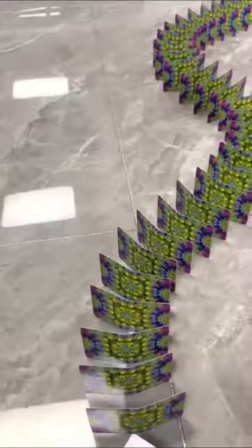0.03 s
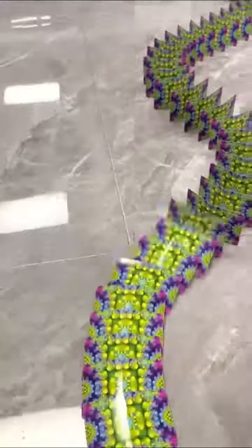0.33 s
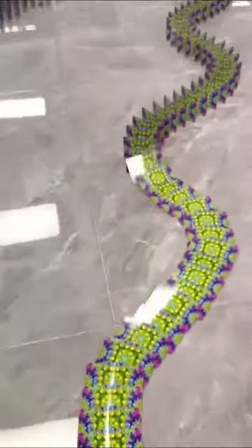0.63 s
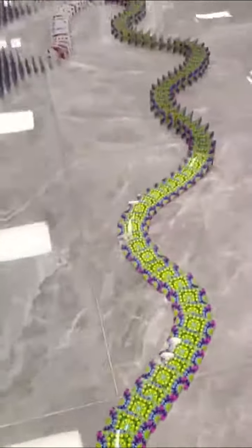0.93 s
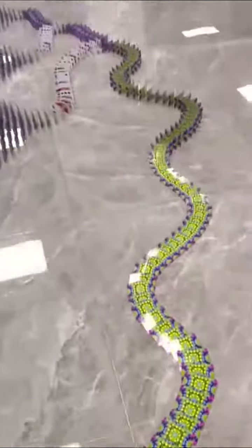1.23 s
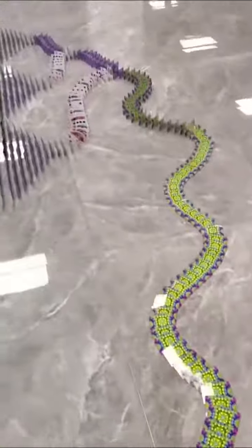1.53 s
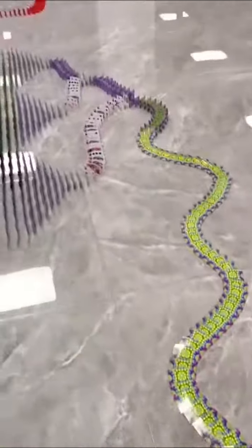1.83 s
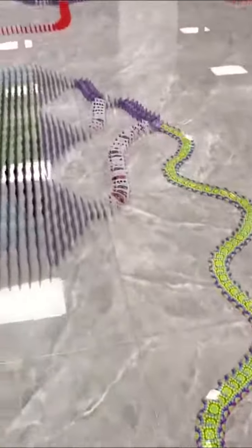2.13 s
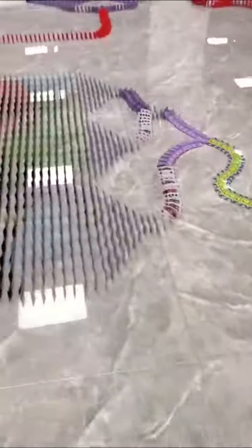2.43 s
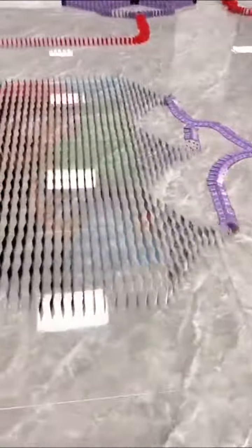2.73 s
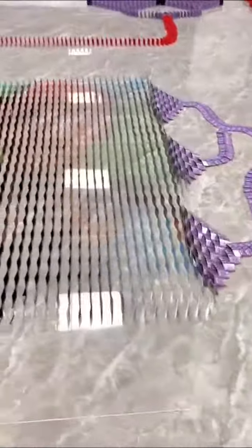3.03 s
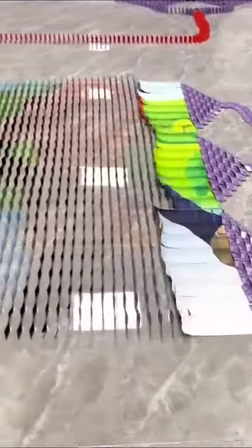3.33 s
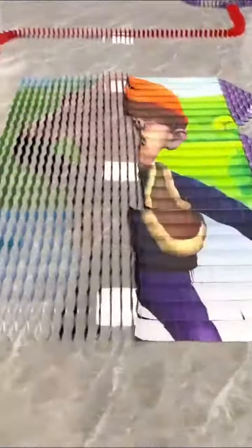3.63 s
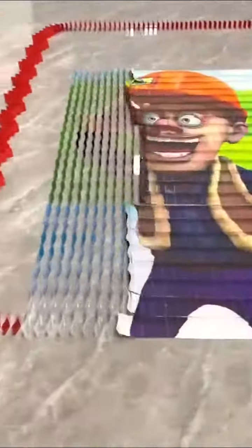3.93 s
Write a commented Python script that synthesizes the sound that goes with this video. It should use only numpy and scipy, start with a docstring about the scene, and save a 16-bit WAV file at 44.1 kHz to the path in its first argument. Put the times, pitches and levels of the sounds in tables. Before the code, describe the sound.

Playing cards topple one after another across a stone floor with a light patter, sliding hiss and scattered snaps. Then a whole field of cards falls in a louder, dense clatter, echoing slightly in a large room.

```python
"""A line of folded playing cards topples away across a stone floor in a large room.
Each card strikes the next and slides down its back: impacts make a patter, friction a hiss.
Single cards snap on the floor; then a whole field goes down, its impacts merging into a dense clatter.
Soft low thumps and a ventilation drone lie underneath, and hard walls add reverberation."""
import sys
import numpy as np
from scipy import signal
from scipy.fft import rfft, irfft
from scipy.io import wavfile

SR = 44100
rng = np.random.default_rng(int(sys.argv[2]) if len(sys.argv) > 2 else 0)


def materialize(psi):
    """Save the field psi as 16-bit PCM at rate SR to the path in sys.argv[1].

    A 1-D psi becomes a single channel; in a 2-D psi each row is a channel.
    """
    bounded = np.clip(np.atleast_2d(psi).T, -1, 1)
    quanta = np.round(bounded * 32767).astype(np.int16)
    wavfile.write(sys.argv[1], SR, quanta)


N = 176400
T = np.arange(N) / SR


def toppling_line():
    """Impact and sliding friction: each card taps the next and slides; the hiss dulls as it recedes."""
    # envelopes of the line (time [s], tap level [dB], slide level [dB])
    envelopes = [(.24, -72, -90), (.262, -38, -61), (.29, -55, -75), (.31, -39, -56), (.338, -56, -77),
                 (.36, -39, -45), (.41, -37, -49.5), (.51, -34, -38), (.62, -60, -46), (.685, -45, -46),
                 (.75, -31, -43), (.83, -60, -54), (.87, -36.5, -48), (.93, -49.5, -51.5),
                 (.97, -42.5, -47), (1.03, -36.5, -40.5), (1.09, -39, -40.5), (1.19, -42, -52),
                 (1.29, -47, -53), (1.36, -37, -47), (1.44, -41.5, -48.5), (1.50, -40.5, -40),
                 (1.62, -38, -49), (1.72, -44, -47.5), (1.81, -45.5, -52.5), (1.87, -37, -43.5),
                 (1.99, -41.5, -48.5), (2.12, -39, -48.5), (2.19, -42.5, -48.5), (2.31, -44.5, -47),
                 (2.35, -40, -40), (2.42, -41, -46), (2.52, -34, -41), (2.66, -40, -44),
                 (2.79, -37.5, -38.5), (2.84, -31.5, -38.5), (2.93, -36.5, -42), (3.1, -41, -41.5),
                 (3.25, -35.5, -38.5), (4, -45, -39.5)]
    # spectra of the taps and of the sliding (frequency [Hz], level [dB])
    tap_spectrum = [(60, -28), (200, 0), (460, -6.5), (680, -0.5), (860, -4), (1100, -1.5), (1350, -3),
                    (2050, 3), (2700, 0.5), (3400, -1.5), (4500, -34.5), (9000, -49), (15000, -80)]
    slide_spectrum = [(1500, -4), (3500, -0.5), (5200, 2.5), (6700, -2.5), (8300, -2), (9600, -10),
                      (12000, -12.5), (15000, -17)]
    sizzle_hz, sizzle_db, recede_db_per_s = 9500, 12.5, 21
    rings = amp(-5) * flexing(decay_s=0.0096, count=3600)
    impacts = unit(contacts(per_s=2000, spread_db=1.5))
    taps = unit(colour(stereo(impacts + rings), tap_spectrum))
    friction = unit(contacts(per_s=4000, spread_db=2))
    slide = unit(colour(stereo(friction + rings), slide_spectrum))
    sizzle = (slide - below(slide, sizzle_hz)) * amp(sizzle_db - recede_db_per_s * T)
    return taps * amp(curve(envelopes, column=1)) + (slide + sizzle) * amp(curve(envelopes, column=2))


def contacts(per_s, spread_db):
    """Shot noise: two independent streams of tiny impacts, random in time, strength and sign."""
    hit = rng.random((2, N)) < per_s / SR
    spread = np.minimum(rng.exponential(size=(2, N)), 4)
    return hit * amp(spread_db * spread) * np.sign(rng.standard_normal((2, N)))


def flexing(decay_s, count, size=900):
    """Damped bending vibration: struck cards ring briefly, each at its own pitch and place."""
    low_hz, high_hz, spread_db = 511.5, 8746, 9
    out, t = np.zeros((2, N)), np.arange(size) / SR
    for when, pitch, strength, place in rng.random((count, 4)):
        hz = low_hz + pitch * (high_hz - low_hz)
        ring = amp(spread_db * strength) * np.sin(2 * np.pi * hz * t) * np.exp(-t / decay_s)
        direction = [np.cos(2 * np.pi * place), np.sin(2 * np.pi * place)]
        add(out, when * N / SR, np.outer(direction, ring))
    return unit(out)


def floor_snaps(size=2600):
    """Impact excitation: a landing card rings, chatters, ticks at its edge and expels trapped air."""
    # landings (time [s], relative level [dB], ring frequency [Hz], tick level [dB], puff level [dB],
    # settling time [s]); tick and puff are relative to ring and chatter together
    landings = [(0.2645, -38.5, 2460, 0, -3, 0.0035), (0.315, -28.5, 1710, -16.5, -7.5, 0.00066),
                (0.3531, -26.5, 1800, -14, -23, 0.0014), (0.3587, -29, 2040, -21, -20, 0.005),
                (0.378, -28, 2240, -0.5, -14, 0.0038), (0.4228, -34, 2480, 0.5, -5, 0.0017),
                (0.4289, -33, 1990, -8, -27, 0.0025), (0.4695, -31.5, 2000, -2.5, -13, 0.0011),
                (0.5512, -25.5, 1900, -3.5, -5.5, 0.0026), (0.5823, -20.5, 2010, -11, -11.5, 0.0029),
                (0.6108, -34.5, 1900, 1, -2.5, 0.0075), (0.6299, -35.5, 2360, 0.5, -25, 0.0032),
                (0.6478, -34.5, 1920, 0, -5, 0.0041), (0.691, -38.5, 2580, 1, -8, 0.0019),
                (0.7752, -27.5, 2210, -2.5, -3, 0.0026), (0.8205, -30, 2400, -3.5, -17, 0.0026),
                (0.8437, -39, 2010, -1, -1, 0.0041), (0.8905, -44, 2380, 0, -19, 0.0031),
                (0.9415, -37, 2720, -1.5, -7, 0.0018), (0.9935, -33, 2420, -4, -8.5, 0.015),
                (1.0226, -35, 2030, -15, -9, 0.0057), (1.0569, -26, 1950, -8, -7.5, 0.00091),
                (1.1222, -34, 2100, -1, -7.5, 0.005), (1.2212, -43, 2430, 1, -2, 0.01),
                (1.2767, -36, 2330, -7, -24, 0.0034), (1.308, -20.5, 2280, -20, -16, 0.00044),
                (1.402, -38.5, 2020, -6, -13, 0.0021), (1.5125, -33.5, 2360, -0.5, -32, 0.0027),
                (1.585, -39.5, 2350, 2, -24, 0.006), (1.8328, -26.5, 1920, -11.5, -20, 0.002),
                (1.8595, -35, 1920, -1.5, -18, 0.011), (2.0351, -37, 2100, -6.5, -9.5, 0.0025),
                (2.0918, -32, 2400, -7.5, -6, 0.0033), (2.4415, -32, 1870, -8, -9, 0.0055),
                (3.0186, -39.5, 2100, 0.5, -2.5, 0.014)]
    # spectra of the chatter, edge tick and air puff (frequency [Hz], level [dB])
    chatter_spectrum = [(200, -13), (450, -27), (680, -4), (1200, 2.5), (2000, 6), (2600, -1), (3500, 0),
                        (5000, -27), (15000, -44)]
    tick_spectrum = [(1000, -35), (3000, 5), (5000, 6), (6800, 0), (8300, 2), (10000, -5.5), (15000, -13)]
    puff_spectrum = [(60, -11.5), (200, 11), (440, 6), (680, 15), (850, 3.5), (1150, 18), (1800, 2),
                     (6000, -13)]
    lead_s, contact_s, brush_s, brush_db = 0.02, 0.0006, 0.005, -14
    ring_rise_s, ring_decay_s = 0.00052, 0.00027
    chatter_db, usual_settle_s = 9, 0.0021
    bend_width_hz, bend_db = 830, 14.5
    edge_hz, edge_spread_hz, edge_width_hz, edge_db = 4700, 800, 400, 9
    out, t = np.zeros((2, N)), np.arange(size) / SR - lead_s
    after, before = np.maximum(t, 0), np.minimum(t, 0)
    strike = np.exp(before / contact_s)
    swell = strike + amp(brush_db) * np.exp(before / brush_s)  # the card first brushes its neighbour
    ring_envelope = (1 - np.exp(-after / ring_rise_s)) ** 2 * np.exp(-after / ring_decay_s)

    def even(x, window_s=0.005):
        """Normalisation to the energy that a signal of rms 1 has in the window."""
        energy = np.mean(np.sum(np.atleast_2d(x) ** 2, axis=1))
        return x / np.sqrt(energy / (window_s * SR))

    def burst(attack, decay_s, spectrum, resonances, side_db):
        """Filtered noise with an exponential decay."""
        rattle = stereo(rng.standard_normal((2, size)), side_db) * attack * np.exp(-after / decay_s)
        return even(colour(rattle, spectrum, resonances))

    for start, db, hz, tick_db, puff_db, settle_s in landings:
        ring = even(np.sin(2 * np.pi * hz * after) * ring_envelope)
        chatter = burst(swell, settle_s, chatter_spectrum, [(hz, bend_width_hz, bend_db)], side_db=-34)
        chatter *= amp(chatter_db) * settle_s / usual_settle_s  # slow settlers chatter more
        edge_mode = (edge_hz + edge_spread_hz * rng.standard_normal(), edge_width_hz, edge_db)
        tick = amp(tick_db) * burst(swell, settle_s, tick_spectrum, [edge_mode], side_db=-1.5)
        puff = amp(puff_db + 2) * burst(strike, settle_s, puff_spectrum, [], side_db=-13.5)
        add(out, start - lead_s, amp(db + 3) * (even(ring + chatter) + tick + puff))
    return out


def falling_field():
    """Incoherent summation: whole rows fall, and their taps and rings merge over a low rustle."""
    # envelopes of the clatter and of the rustle at its onset (time [s], level [dB])
    clatter_envelope = [(3.19, -51), (3.215, -41), (3.232, -25), (3.29, -24.5), (3.335, -20.5), (3.38, -22),
                        (3.5, -20.5), (3.65, -19.5), (3.85, -20), (4, -21)]
    rustle_envelope = [(3.15, -54), (3.26, -43), (3.5, -39.5), (3.75, -87)]
    # their spectra (frequency [Hz], level [dB])
    clatter_spectrum = [(60, -28), (230, -33), (400, -19), (850, -16), (1500, -2.5), (2600, -2.5),
                        (3000, -8), (4400, -14), (6000, -13.5), (8400, -18.5), (10000, -20), (15000, -23)]
    rustle_spectrum = [(160, -29.5), (340, -8), (640, -29.5)]
    # resonances of the cards (frequency [Hz], width [Hz], gain [dB])
    card_modes = [(606, 400, 13.5), (1113, 177, 12.5), (1656, 370, 9.5), (2240, 82, 8.5), (2610, 160, 3.5),
                  (3560, 790, 3.5), (5300, 460, 6.5)]
    impacts = unit(contacts(per_s=12000, spread_db=-1))
    rings = amp(-5) * flexing(decay_s=0.0031, count=11000)
    clatter = unit(colour(stereo(impacts + rings, side_db=-0.5), clatter_spectrum, card_modes))
    rustle = unit(colour(rng.standard_normal((2, N)), rustle_spectrum))
    return clatter * amp(curve(clatter_envelope)) + rustle * amp(curve(rustle_envelope))


def thumps(size=5000):
    """Heavily damped oscillation: a few low cycles and a dull knock, as of steps and handling."""
    # bumps (time [s], relative level [dB], frequency [Hz])
    bumps = [(0.463, -36, 144), (0.557, -36, 167), (0.664, -41, 116), (1.512, -41.5, 111),
             (1.689, -24.5, 152), (2.095, -40.5, 180), (2.256, -40, 105), (2.524, -42, 102),
             (2.734, -42, 75), (2.925, -37.5, 215), (2.949, -35, 155)]
    # spectrum of the knock (frequency [Hz], level [dB])
    knock_spectrum = [(40, -15), (160, -0.5), (380, -1), (700, -25), (3000, -60)]
    rise_s, decay_s, knock_db = 0.0026, 0.0079, -14
    out, t = np.zeros((2, N)), np.arange(size) / SR
    envelope = 2 * (1 - np.exp(-t / rise_s)) * np.exp(-t / decay_s)
    for start, db, hz in bumps:
        noise = stereo(rng.standard_normal((2, size)), side_db=-15)
        knock = amp(knock_db) * unit(colour(noise, knock_spectrum))
        add(out, start, amp(db) * envelope * (knock - np.sin(2 * np.pi * hz * t)))
    return out


def ventilation():
    """Stationary broadband noise: a low spectral peak is heard as a drone."""
    # spectrum of the ventilation (frequency [Hz], level [dB])
    spectrum = [(25, -12), (60, -6), (105, -10.5), (148, 9), (190, -7.5), (350, -15.5), (700, -19.5),
                (1400, -23.5), (2300, -14), (4000, -30.5), (8000, -30.5), (15000, -44)]
    noise = stereo(rng.standard_normal((2, N)), side_db=-0.5)
    return amp(-51) * unit(colour(noise, spectrum))


def reverberation(x, bands=9):
    """Diffuse reflection from hard walls: each band decays exponentially, the top treble fastest."""
    # decay of the room (frequency [Hz], reverberation time [s])
    t60 = [(100, 0.11), (680, 0.94), (2000, 0.35), (5000, 0.36), (15000, 0.07)]
    room_db, build_s, reference_t60_s = -5.5, 0.0039, t60[2][1]
    t, hz = T[:SR], np.fft.rfftfreq(SR, 1 / SR)
    noise_bins = rfft(rng.standard_normal((2, SR)))
    centres = np.geomspace(60, 15000, bands)
    tail = np.zeros((2, SR))
    for centre, weights in zip(centres, np.eye(bands)):
        band = irfft(noise_bins * at_hz(np.c_[centres, weights], hz))
        tail += band * np.exp(-np.log(1000) * t / at_hz(t60, centre))
    tail *= 1 - np.exp(-t / build_s)
    tail *= np.sqrt(2 * np.log(1000) / (SR * reference_t60_s))  # normalise by the reference decay
    return amp(room_db) * signal.fftconvolve(x, tail, axes=1)[:, :N]


def amp(db):
    """Decibels to amplitude ratio."""
    return 10 ** (np.asarray(db) / 20)


def unit(x):
    """Normalisation to rms 1."""
    return x / np.sqrt(np.mean(x ** 2) + 1e-20)


def curve(rows, column=1):
    """Linear interpolation of a level column over time; silent before the first row."""
    rows = np.array(rows)
    return np.interp(T, rows[:, 0], rows[:, column], left=-120)


def at_hz(points, hz):
    """Interpolation on a logarithmic frequency axis."""
    points = np.array(points)
    return np.interp(np.log(np.maximum(hz, 1)), np.log(points[:, 0]), points[:, 1])


def colour(x, spectrum, resonances=(), size=4096):
    """Minimum-phase filtering by a spectrum and optional resonances."""
    hz = np.fft.rfftfreq(size, 1 / SR)
    peaks_db = sum(db / (1 + (2 * (hz - centre) / width) ** 2) for centre, width, db in resonances)
    cepstrum = irfft(np.log(amp(at_hz(spectrum, hz) + peaks_db)))
    cepstrum[1:size // 2] *= 2  # folding the cepstrum makes the filter causal
    cepstrum[size // 2 + 1:] = 0
    impulse_response = irfft(np.exp(rfft(cepstrum)))
    return signal.fftconvolve(x, impulse_response[None], axes=1)[:, :x.shape[1]]


def below(x, hz):
    """Zero-phase low-pass filtering."""
    return signal.sosfiltfilt(signal.butter(4, hz, fs=SR, output="sos"), x)


def stereo(pair, side_db=0):
    """Matrixing of mid and side to left and right."""
    return pair[0] + amp(side_db) * pair[1] * np.array([[1], [-1]])


def add(out, start_s, sound):
    """Superposition of a sound from a given time."""
    i = int(start_s * SR)
    out[:, i:i + sound.shape[1]] += sound[:, :N - i]


def scene():
    """Superposition of direct sound, its reverberation and the ventilation."""
    direct = floor_snaps() + toppling_line() + falling_field() + thumps()
    return direct + reverberation(direct) + ventilation()


def record(dry):
    """Filtering and compression: width and treble are shaped, and loud sound turns the bass down."""
    # stereo width of the microphone pair (frequency [Hz], side gain [dB])
    width = [(50, -3), (130, -7.5), (220, -0.5), (380, -2), (600, 0), (1100, -1), (1550, -3), (1820, -14.5),
             (2150, -1), (2700, 0.5), (15000, -1)]
    # microphone response (frequency [Hz], gain [dB])
    response = [(7000, -0.5), (9200, -2), (15000, -3.5)]
    # a narrow gap in the treble near 9.4 kHz (frequency [Hz], width [Hz], gain [dB])
    treble_gap = [(9400, 230, -18)]
    silent_until_s, top_hz = 0.068, 15100
    threshold_db, reaction_s, bass_hz = -27.5, 0.24, 218
    mid, side = (dry[0] + dry[1]) / 2, (dry[0] - dry[1]) / 2
    narrowed = stereo([mid, colour(side[None], width)[0]])
    heard = colour(narrowed, response, treble_gap) * (T > silent_until_s)
    smoothing = 1 / (reaction_s * SR)
    power = signal.lfilter([smoothing], [1, smoothing - 1], mid ** 2)
    bass_gain = amp(threshold_db) / np.maximum(np.sqrt(power), amp(threshold_db))
    heard -= (1 - bass_gain) * below(heard, bass_hz)
    return signal.sosfilt(signal.ellip(8, .2, 70, top_hz, fs=SR, output="sos"), heard)


dry = scene()
out = record(dry)
materialize(out)
```